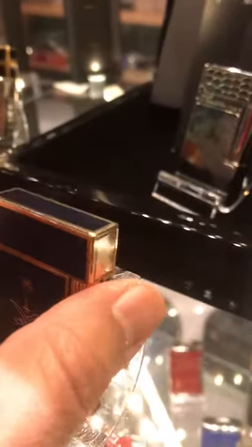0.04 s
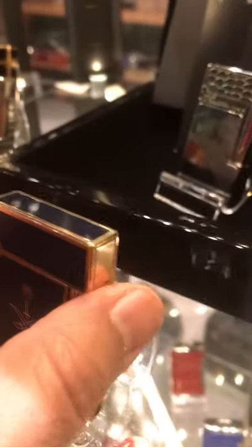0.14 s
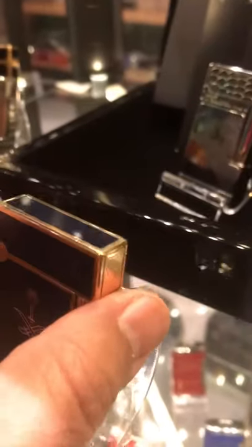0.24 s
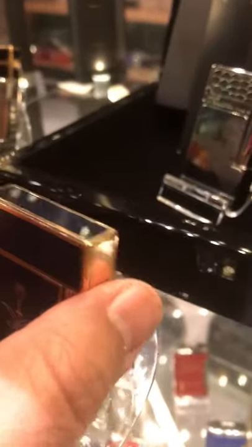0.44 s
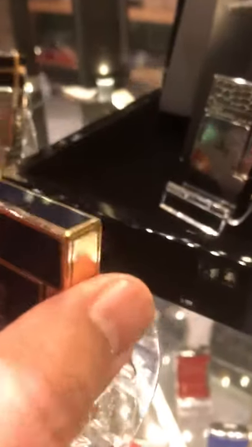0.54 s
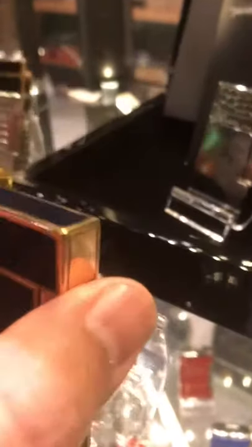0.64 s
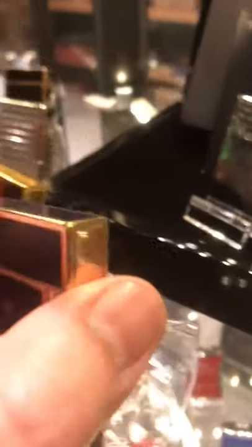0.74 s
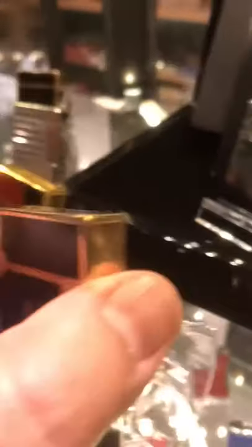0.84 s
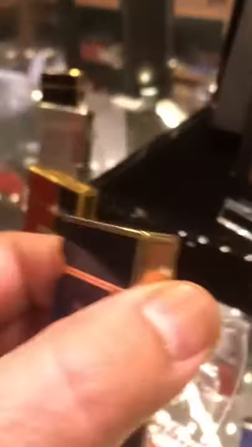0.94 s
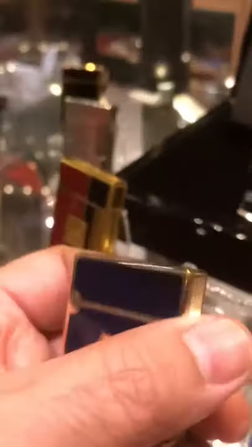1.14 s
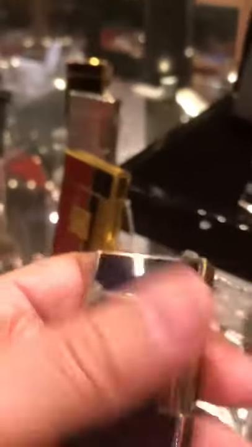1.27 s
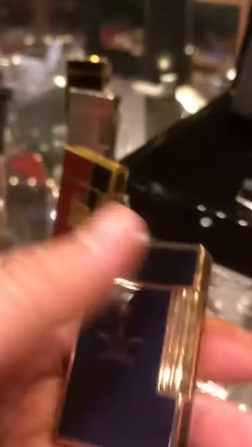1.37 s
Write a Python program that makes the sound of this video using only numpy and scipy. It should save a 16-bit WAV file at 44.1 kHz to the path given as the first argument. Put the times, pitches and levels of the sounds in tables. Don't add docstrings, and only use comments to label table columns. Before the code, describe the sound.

Sharp brass lighter lid snap, close and dry, bouncing in a quick cluster of clicks with a brief high ring; a small hard-surfaced shop answers, its steady low ventilation hum continuing underneath in mono.

```python
import sys
import numpy as np
from scipy import signal
from scipy.fft import rfft, irfft
from scipy.io import wavfile

SR = 44100
rng = np.random.default_rng(int(sys.argv[2]) if len(sys.argv) > 2 else 0)


def persist_wave(psi):
    counts = np.round(np.clip(psi, -1, 1) * 32767).astype(np.int16)
    wavfile.write(sys.argv[1], SR, np.atleast_2d(counts).T)


def to_linear_factor(level_db):
    exponent = np.asarray(level_db, float) / 20
    return 10 ** exponent


N = 63945

# (frequency [Hz], density [dB per Hz])
VENTILATION_COLOUR = [(26, -36), (37, -4), (65, -1), (103, -3), (151, -7.5), (205, -11), (232, -23.5),
                      (420, -37.5)]
# (frequency [Hz], density [dB per Hz])
AIR_COLOUR = [(220, -19), (350, -3), (600, -3), (1000, -7.5), (4000, -22), (8000, -34.5), (10200, -38.5),
              (15800, -38)]
# (frequency [Hz], rms level [dB], line width [Hz])
HUM_TONES = [(100.97, -38, 1.8), (195.4, -49, 12), (609, -65, 2), (737, -65, 3), (12700, -88, 200)]
# (time [s], knock [dB], case ring [dB], lid ring [dB], spring ring [dB])
CONTACTS = [(.2070, -45, -64, -65, -69), (.2128, -55.5, -67, -58, -70), (0.221, -60, -66, -71.5, -52.5),
            (0.223, -60.5, -69, -68.5, -50.5), (0.2296, -2.5, -6.5, -29.5, -24),
            (.2328, -18, -20.5, -28, -23), (0.236, -11.5, -16.5, -31.5, -18), (0.2381, -8, -22, -32, -27),
            (0.2499, -5, -19.5, -31, -27.5), (0.254, -15, -28.5, -32, -33),
            (0.2639, -15.5, -26.5, -7.5, -13), (.2668, -17, -26.5, -16, -15),
            (.2740, -18.5, -33, -21.5, -26), (.2795, -21, -37, -34, -32.5),
            (0.302, -27.5, -43.5, -45.5, -31), (0.3087, -22.5, -37.5, -36, -27.5),
            (0.312, -33, -42.5, -41, -29.5), (0.3336, -29.5, -36, -42, -39), (0.353, -36.5, -79, -52, -50)]
# (frequency [Hz], level [dB], t60 [s])
KNOCK_MODES = [(260, -22.5, .05), (542, -28.5, .05), (809, -22, .04), (1060, -17.5, .03), (1500, -6, .02),
               (1970, -8, .015), (2500, -11, .012), (3100, -4.5, 0.0067), (3700, -5.5, 0.0068),
               (5360, -16, 0.0052), (7530, -17.5, 0.011), (8500, -20, .004), (12400, -15, .005)]
# (frequency [Hz], level [dB], t60 [s])
CASE_MODES = [(2622, -11, .05), (3085, -12, .05), (3610, -6.5, 0.01), (4168, -6, .05), (4805, -12.5, 0.038),
              (5114, -8.5, .046), (7805, -11, .05), (8800, -17, .03), (9227, -15, 0.066),
              (10070, -16, 0.043), (10440, -7, .05), (11070, -17.5, .05), (14025, -9.5, .044),
              (14970, -26.5, .03)]
# (frequency [Hz], level [dB], t60 [s])
LID_MODES = [(2420.4, -12, .044), (3133, -11, .03), (3836, -16.5, .034), (4310, -7.5, .042),
             (5216, -4.5, .05), (8670, -10, .047), (10430, -12.5, .031), (10940, -10.5, .025),
             (11290, -6.5, .035), (11750, -20, .02), (13526, -5.5, 0.032), (13970, 1, .037),
             (14500, -12, .025), (15160, -22.5, .03)]
# (frequency [Hz], level [dB], t60 [s])
SPRING_MODES = [(3104, 1.5, 0.034), (6056, 2, .045), (6280, -5.5, .03), (6580, -3.5, 0.054),
                (14025, -16, .04)]
# (frequency [Hz], level [dB], t60 [s])
AFTERRING_MODES = [(2580, -42, .5), (3220, -45, 0.45), (3914, -43.5, .5), (5160, -39, .6),
                   (6012, -41, 0.71), (6650, -44, .45), (8610, -47.5, .4), (9010, -52, .35),
                   (11230, -43, .42)]
# (frequency [Hz], density [dB per Hz])
ECHO_COLOUR = [(300, -23.5), (550, -5), (1000, 0), (1600, 6.5), (2500, 1), (4000, 0.5), (7000, -8),
               (13000, -16)]
# (frequency [Hz], t60 [s])
ECHO_T60 = [(400, .4), (1500, 0.28), (3000, 0.25), (14000, .1)]
# (frequency [Hz], level [dB])
LATE_COLOUR = [(500, -8.5), (1500, -5), (3500, 6.5), (6000, 1.5), (12000, -7)]
# (frequency [Hz], density [dB per Hz])
HISS_COLOUR = [(2500, 1), (5000, -3.5), (8000, -7.5), (11000, -10.5), (15700, -9)]

VENTILATION_DB, AIR_DB = -34, -54
STRIKE_SPREAD_DB = 2
CHATTER_S, SECOND_TAP_DB = .00031, 2.5
AFTERRING_WAVER_HZ = 25.18
BODY_LOW_HZ = 353
ECHO_DB, LATE_DB, LATE_STRETCH = -10, -31.5, 4.5
HISS_START_S, HISS_END_S, HISS_FADE_S, HISS_DB = .3, .68, .012, -61.5
DUCK_DB, DUCK_START_S, DUCK_HOLD_S, DUCK_RECOVER_S = -2, 0.21, 0.23, 0.07
CEILING, TOP_HZ = 1.15, 16300


def at_hz(points, hz):
    points = np.array(points)
    return np.interp(np.log(hz), np.log(points[:, 0]), points[:, 1])


def coloured(spectrum):
    hz = np.maximum(np.fft.rfftfreq(N, 1 / SR), 1)
    inside = (hz >= spectrum[0][0]) & (hz <= spectrum[-1][0])
    white = rfft(rng.standard_normal(N))
    noise = irfft(white * to_linear_factor(at_hz(spectrum, hz)) * inside, N)
    return noise / np.sqrt(np.mean(noise ** 2) + 1e-20)


def shop():
    t = np.arange(N) / SR
    out = to_linear_factor(VENTILATION_DB) * coloured(VENTILATION_COLOUR) + to_linear_factor(AIR_DB) * coloured(AIR_COLOUR)
    for hz, db, width_hz in HUM_TONES:
        wander = np.cumsum(rng.standard_normal(N)) * np.sqrt(2 * np.pi * abs(width_hz) / SR)
        out = out + to_linear_factor(db) * np.sqrt(2) * np.sin(2 * np.pi * hz * t + wander)
    return out


def contact_clicks(db, double=False):
    clicks = np.full(N, 1e-18)
    clicks[(np.array(CONTACTS)[:, 0] * SR).astype(int)] = to_linear_factor(db)
    second = to_linear_factor(SECOND_TAP_DB) * np.roll(clicks, int(CHATTER_S * SR))
    return clicks + double * second


def struck(modes, db, double=False, waver_hz=0):
    out = np.zeros(N)
    chance = rng.standard_normal((len(db), len(modes)))
    for k, (hz, level_db, t60) in enumerate(modes):
        strength_db = db + level_db + STRIKE_SPREAD_DB * chance[:, k]
        drive = (-1) ** k * contact_clicks(strength_db, double)
        radius, w = to_linear_factor(-60 / (t60 * SR)), 2 * np.pi * hz / SR
        resonator = [1, -2 * radius * np.cos(w), radius * radius]
        ring = signal.lfilter([0, np.sin(w)], resonator, drive)
        if waver_hz:
            ring = ring * (1.2 + .45 * coloured([(2, 0), (waver_hz, 0)]))
        out += ring
    return out


def lighter():
    _, knock_db, case_db, lid_db, spring_db = np.transpose(CONTACTS)
    knock = struck(KNOCK_MODES, knock_db, double=True)
    rings = struck(CASE_MODES, case_db) + struck(LID_MODES, lid_db) + struck(SPRING_MODES, spring_db)
    afterring = struck(AFTERRING_MODES, np.maximum(case_db, lid_db), waver_hz=AFTERRING_WAVER_HZ)
    reflections = echo(contact_clicks(knock_db))
    no_bass = signal.butter(4, BODY_LOW_HZ, "high", fs=SR, output="sos")
    return signal.sosfilt(no_bass, knock + rings + afterring + reflections)


def echo(x):
    t = np.arange(SR) / SR
    edges = 300 * 2 ** np.arange(0, 5.8, .5)
    white = rng.standard_normal((2, SR))
    tail = 0
    for k, (low, high) in enumerate(zip(edges, edges[1:])):
        hz = np.sqrt(low * high)
        bandpass = signal.butter(2, [low, high], "band", fs=SR, output="sos")
        band = signal.sosfilt(bandpass, white[k % 2]) * to_linear_factor(at_hz(ECHO_COLOUR, hz))
        fall_db = -60 * t / at_hz(ECHO_T60, hz)
        late_db = LATE_DB + at_hz(LATE_COLOUR, hz) + fall_db / LATE_STRETCH
        tail = tail + band * (to_linear_factor(fall_db) + to_linear_factor(late_db))
    return to_linear_factor(ECHO_DB) * signal.fftconvolve(x, tail)[:N]


def hiss():
    t = np.arange(N) / SR
    fade_in = np.clip((t - HISS_START_S) / HISS_FADE_S, 0, 1)
    fade_out = np.clip((HISS_END_S - t) / HISS_FADE_S, 0, 1)
    return to_linear_factor(HISS_DB) * fade_in * fade_out * coloured(HISS_COLOUR)


def scene():
    return (shop() + lighter() + hiss())[None]


def roll_off(x):
    return signal.sosfilt(signal.butter(12, 15770, fs=SR, output="sos"), x)


def record(dry):
    t = np.arange(N) / SR - DUCK_START_S
    dip = np.clip(t / .01, 0, 1)
    recovery = np.clip(1 - (t - DUCK_HOLD_S) / DUCK_RECOVER_S, 0, 1)
    ducked = to_linear_factor(DUCK_DB * dip * recovery) * dry
    rounded = CEILING * np.tanh(ducked / CEILING)
    top_cut = signal.cheby2(16, 60, TOP_HZ, fs=SR, output="sos")
    return roll_off(signal.sosfilt(top_cut, rounded))


dry = scene()
out = record(dry)
persist_wave(out)
```